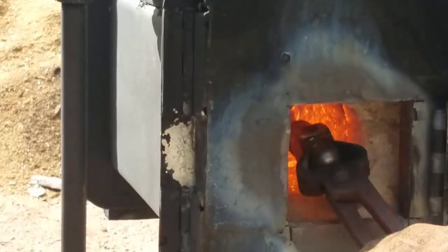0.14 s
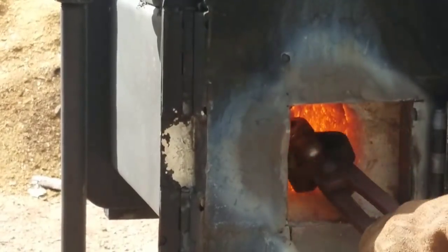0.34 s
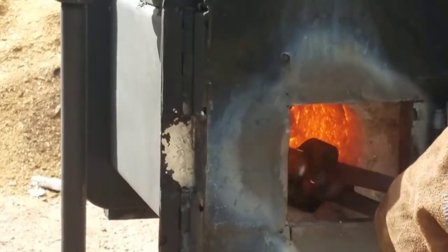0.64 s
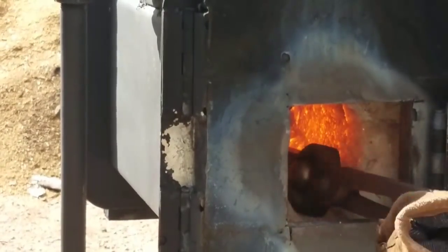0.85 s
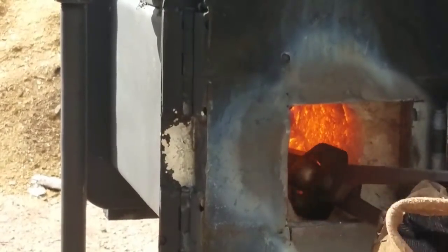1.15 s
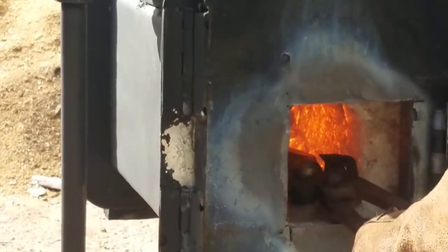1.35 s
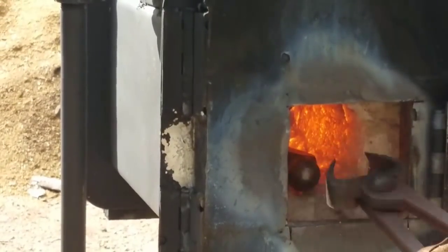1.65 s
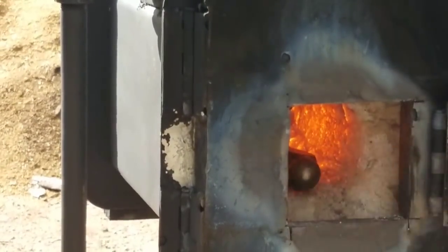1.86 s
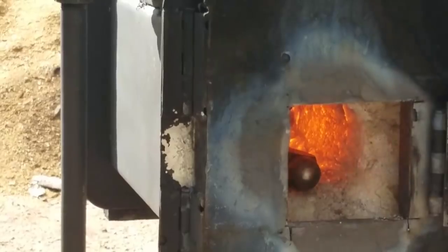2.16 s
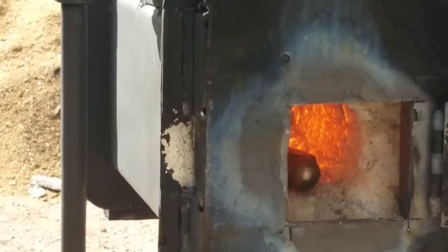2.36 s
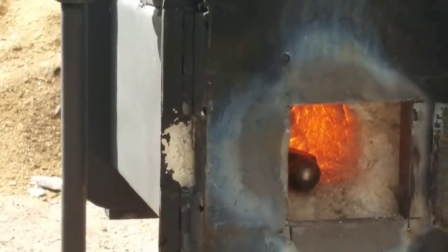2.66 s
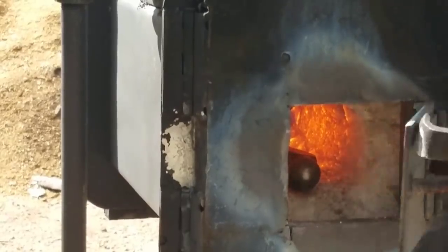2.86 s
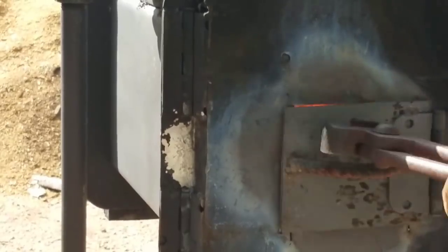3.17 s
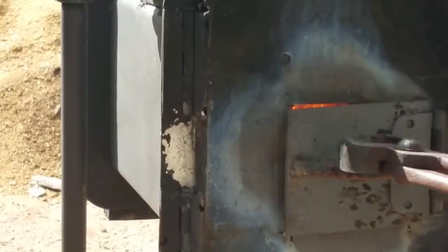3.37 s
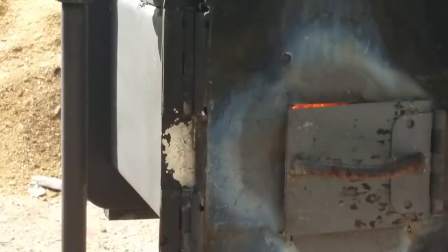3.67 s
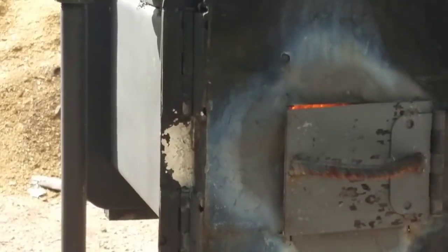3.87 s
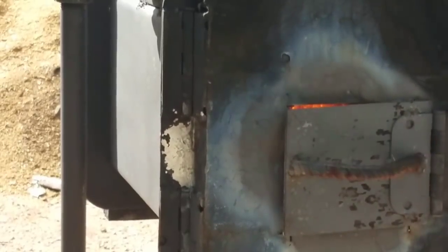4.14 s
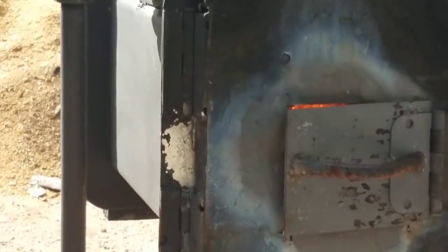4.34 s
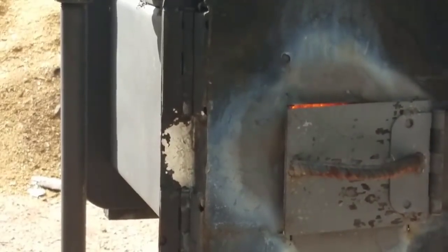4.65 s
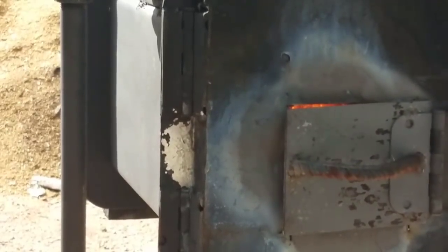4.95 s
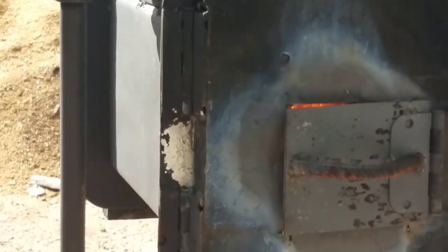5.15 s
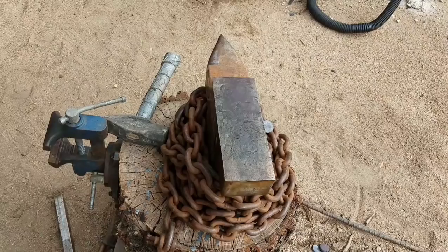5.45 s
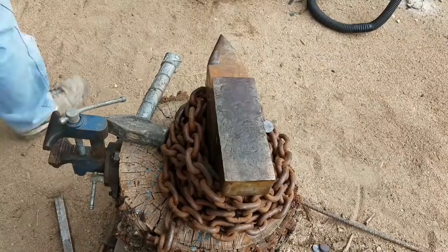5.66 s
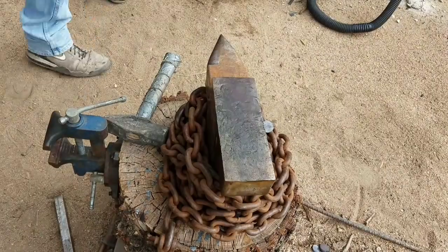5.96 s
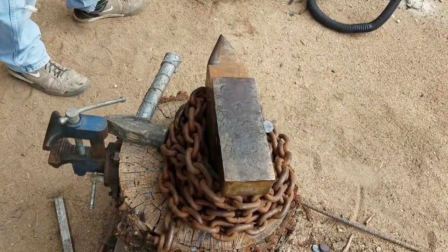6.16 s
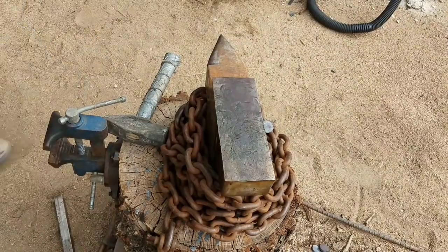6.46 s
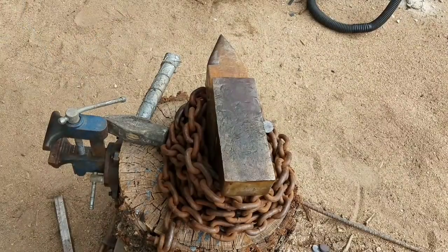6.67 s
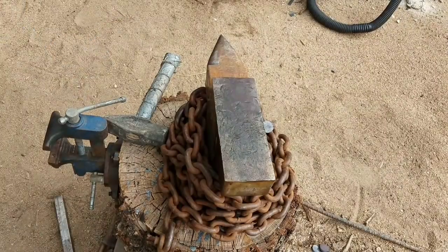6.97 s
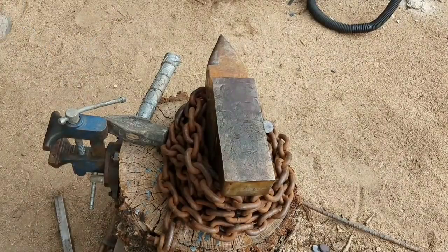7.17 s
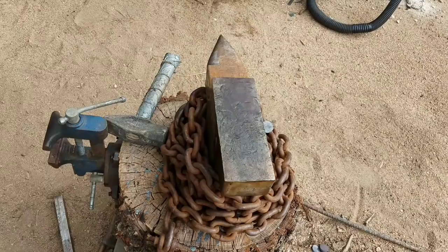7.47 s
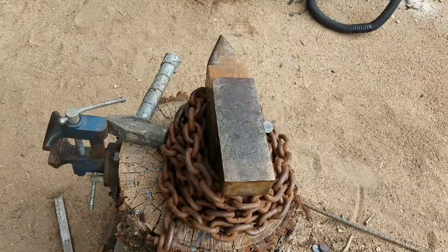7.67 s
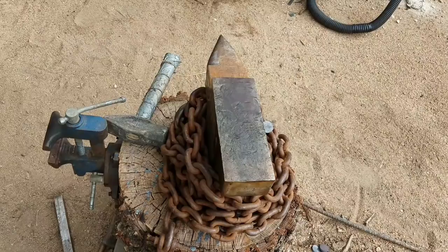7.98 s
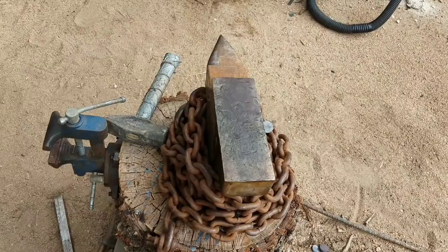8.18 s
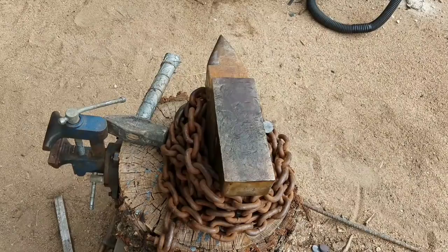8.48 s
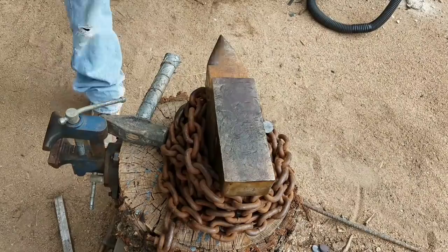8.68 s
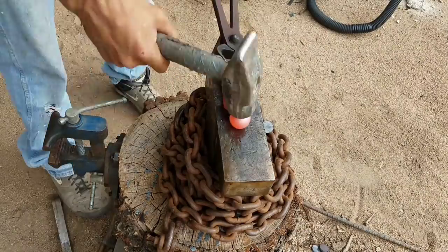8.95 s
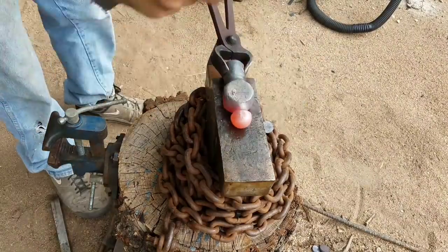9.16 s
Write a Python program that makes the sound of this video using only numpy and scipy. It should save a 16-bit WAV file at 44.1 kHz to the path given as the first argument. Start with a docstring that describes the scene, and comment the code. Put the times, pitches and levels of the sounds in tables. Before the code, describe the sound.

Rushing forge fire fades, giving way to a thinner whining blower, a few metal ticks and a single sharp hammer strike on hot iron.

```python
"""A smithy. Close by, a blower-fed forge roars: flame and air jet sound through a resonant chamber.
Its door swings shut at about 3 s, shifting the resonances; near 5 s the roar dies down.
After a short silence, at the anvil: the blower's rush, hiss and shaft whine. Tools tick, then at 9.2 s
one hammer blow lands on hot, soft iron, which chokes the ring; the gain control ducks everything."""
import sys
import numpy as np
from scipy import signal
from scipy.fft import rfft, irfft
from scipy.io import wavfile
from scipy.ndimage import uniform_filter1d

SR = 44100
rng = np.random.default_rng(int(sys.argv[2]) if len(sys.argv) > 2 else 0)


def put_to_file(sound):
    """Save the sound as 16-bit audio at rate SR, in the file named by the first command-line argument."""
    columns = np.atleast_2d(sound).T  # one column per channel
    safe = np.clip(columns, -1, 1)
    whole_steps = np.round(safe * 32767)
    wavfile.write(sys.argv[1], SR, whole_steps.astype(np.int16))


N = 411012
FRAME, HOP = 2048, 512
TIME_S = np.arange(N) / SR
FRAME_TIME_S = np.arange(N // HOP + 5) * HOP / SR
BIN_HZ = np.fft.rfftfreq(FRAME, 1 / SR)


def gain_of(db):
    """Decibels to amplitude."""
    return 10 ** (np.asarray(db) / 20)


def unit_rms(x):
    """Scale to rms 1."""
    return x / np.sqrt(np.mean(x ** 2) + 1e-20)


def since(start_s, t):
    """Seconds since the start, zero before it."""
    return np.maximum(t - start_s, 0)


def follow(curve, t):
    """Curve value at times t."""
    return np.interp(t, *np.transpose(curve))


def swing(curve, t):
    """Curve value at times t, less its mean."""
    return follow(curve, t) - follow(curve, np.linspace(curve[0][0], curve[-1][0])).mean()


def spectrum(points):
    """Value per bin, interpolated over log frequency."""
    hz, value = np.transpose(points)
    return np.interp(np.log(BIN_HZ + 1), np.log(hz + 1), value)


def resonance(hz, width_hz):
    """Bell of height 1; full width at half height."""
    return .5 ** ((2 * (BIN_HZ - hz) / width_hz) ** 2)


def wander(rate_hz):
    """Random drift, rms 1, rolled off above the rate."""
    size, step_s = N // 64 + 2, 64 / SR
    lowpass = np.exp(-(np.fft.rfftfreq(size, step_s) / rate_hz) ** 2)
    drift = irfft(rfft(rng.standard_normal(size)) * lowpass, size)
    return np.interp(TIME_S, np.arange(size) * step_s, unit_rms(drift))


def pan(x, left_db):
    """Stereo, with left_db of left over right."""
    return x * gain_of([[left_db / 2], [-left_db / 2]])


def turbulence(colour_db, coherence, phase):
    """Coloured stereo noise; random short patches of the spectrum swell and dip, a faint swirl."""
    a, b, c, d, patches = rng.standard_normal((5, len(FRAME_TIME_S), len(BIN_HZ)))
    patches = uniform_filter1d(patches, size=4, axis=0)
    patch_db = .7 * unit_rms(uniform_filter1d(patches, size=20, axis=1))
    shared = np.clip(spectrum(coherence), -1, 1)
    left = a + 1j * b
    right = (shared * left + np.sqrt(1 - shared ** 2) * (c + 1j * d)) * np.exp(-1j * spectrum(phase))
    frames = np.array([left, right]) * gain_of(colour_db + patch_db)
    noise = signal.istft(frames.transpose(0, 2, 1), nperseg=FRAME, noverlap=FRAME - HOP)[1][:, :N]
    return noise / noise.mean(0).std()


# Left-right likeness at the forge: (frequency [Hz], coherence [0-1])
FORGE_COHERENCE = [(30, 1), (400, 0.98), (800, 0.83), (1150, 0.64), (1400, 0.64), (1650, 0.17),
                   (1900, 0.75), (2500, 0.97), (3100, 0.74), (3700, 0.38), (5500, 0.39), (8000, .14),
                   (13000, .14)]
# Left lead at the forge: (frequency [Hz], phase [rad])
FORGE_PHASE_RAD = [(30, 0), (6500, -0.05), (8500, -2), (9300, 1.5), (13000, -5.5)]


def forge_noise(colour_db):
    """Turbulence with the forge's stereo spread."""
    return turbulence(colour_db, FORGE_COHERENCE, FORGE_PHASE_RAD)


# Forge door: (time [s], opening [0-1])
DOOR_OPENING = [(0, 1), (2.85, 1), (3.2, 0.22), (5.4, 0)]
# Chamber and jet resonances: (frequency [Hz], width [Hz], door open [dB], door shut [dB])
CHAMBER_MODES = [(241.4, 41, 3.5, 3.5), (368, 24, 2.5, -12.5), (451, 34, 9, 7.5), (547, 17, 6, 7.5),
                 (660, 72, 0, 8), (830, 170, 1.5, 3), (1064, 31, 4, 7.5), (1205, 14, 7.5, 9),
                 (1274, 25, 2.5, 8.5), (2150, 170, -1.5, -1), (2590, 96, 2.5, 4)]


def chamber_db():
    """Fire chamber gain per frame and bin; the door reweights its resonances."""
    opening = follow(DOOR_OPENING, FRAME_TIME_S)[:, None]
    return sum(resonance(hz, width_hz) * (opening * open_db + (1 - opening) * shut_db)
               for hz, width_hz, open_db, shut_db in CHAMBER_MODES)


CHOKE_START_S, CHOKE_DB_PER_S = 3.7, .5
EBB_START_S, ROAR_SAG_DB_PER_S = 4.875, 8.5
# Flame spectrum: (frequency [Hz], relative density [dB])
ROAR_SPECTRUM = [(20, -39), (40, -42), (60, -21), (85, -6.5), (112, -12), (170, -2), (250, -1), (330, -2),
                 (400, -8.5), (500, -9), (600, -18), (780, -26), (1100, -26.5), (2500, -51.5)]


def flame_roar(flicker, level_db=-13.5):
    """Flame in the chamber: weakens slowly behind the shut door, then dies down."""
    choke_db = CHOKE_DB_PER_S * since(CHOKE_START_S, TIME_S)
    sag_db = ROAR_SAG_DB_PER_S * since(EBB_START_S, TIME_S)
    roar = forge_noise(spectrum(ROAR_SPECTRUM) + chamber_db())
    return roar * gain_of(level_db - choke_db - sag_db + .15 * flicker)


# Air jet strength: (time [s], relative level [dB])
JET_STRENGTH = [(0, -29.1), (0.45, -28.5), (0.85, -29.2), (1.2, -28.3), (1.6, -28.5), (2.07, -30.5),
                (2.28, -28), (2.5, -28.5), (2.85, -27.5), (3.05, -28.5), (4.1, -29.0), (4.45, -28.5),
                (4.7, -29)]


def jet_db(t, flare_at_s=4.845, flare_s=.035, flare_db=2.2):
    """Jet strength about its mean, with one flare before the fire ebbs."""
    return swing(JET_STRENGTH, t) + flare_db * np.exp(-((t - flare_at_s) / flare_s) ** 2)


def jet_break(t, break_s=.025):
    """How far the jet's hollow tone has broken off, 0-1."""
    return np.minimum(since(EBB_START_S, t) / break_s, 1)


# Air jet spectrum: (frequency [Hz], relative density [dB])
RUSH_SPECTRUM = [(400, 3), (800, -0.5), (1100, -3.5), (1400, 5), (1700, 1), (2500, -1.5), (3300, -2.5),
                 (4300, -4.5), (5400, -6), (6500, -9), (8000, -10), (9300, -16.5), (13500, -38)]


def jet_rush(flow_db, flicker, level_db=-24.5):
    """Air jet through the chamber; its hollow tone follows the jet and breaks off at the ebb."""
    height_db = 2.5 + .76 * jet_db(FRAME_TIME_S) - 6 * jet_break(FRAME_TIME_S)
    hollow_db = height_db[:, None] * resonance(hz=3340, width_hz=700)
    rush = forge_noise(spectrum(RUSH_SPECTRUM) + chamber_db() + hollow_db)
    return rush * gain_of(level_db + flow_db + .65 * flicker)


# Jet fizz spectrum: (frequency [Hz], relative density [dB])
FIZZ_SPECTRUM = [(5000, -19), (8500, -13.5), (10000, -4.5), (11300, 3), (13400, -1), (15000, -30)]


def jet_fizz(flicker, level_db=-40, rise_db_per_s=8):
    """High fizz driven by the jet; steps up and keeps rising as the fire ebbs."""
    rise_db = 2.3 * jet_break(TIME_S) + rise_db_per_s * since(EBB_START_S, TIME_S)
    fizz = forge_noise(spectrum(FIZZ_SPECTRUM))
    return fizz * gain_of(level_db + 1.1 * jet_db(TIME_S) + rise_db + .7 * flicker)


# Blower whine: (order [x shaft speed], base level at forge [dB], level at anvil [dB])
WHINE_ORDERS = [(1, -31, -60), (2, -37, -56), (3, -40, -60), (4, -33.5, -26), (5, -50, -62), (6, -46, -53),
                (8, -60, -37.5), (10, -50, -64), (12, -60, -44), (16, -66, -54), (20, -66, -46)]


def blower_whine(place, shaft_hz, waver_hz, scatter, scatter_hz):
    """Shaft harmonics; moving air scatters part of each line, so it fades and blurs."""
    turns = np.cumsum(shaft_hz + waver_hz * wander(rate_hz=12.45)) / SR
    out = np.zeros(N)
    for order, forge_db, anvil_db in WHINE_ORDERS:
        angle = 2 * np.pi * (order * turns + rng.random())
        in_phase = (1 + scatter * wander(scatter_hz)) * np.sin(angle)
        quadrature = scatter * wander(scatter_hz) * np.cos(angle)
        out += gain_of(forge_db if place == "forge" else anvil_db) * unit_rms(in_phase + quadrature)
    return out


def forge(flow_sag_db_per_s=5.5):
    """The unsteady flame shakes roar, rush and fizz together; rush and whine follow the airflow."""
    flicker = wander(rate_hz=22)
    flow_db = jet_db(TIME_S) - flow_sag_db_per_s * since(EBB_START_S, TIME_S)
    roar = flame_roar(flicker)
    rush = jet_rush(flow_db, flicker)
    fizz = jet_fizz(flicker)
    whine = blower_whine("forge", shaft_hz=331.7, waver_hz=.5, scatter=.38, scatter_hz=35)
    whine *= gain_of(flow_db + .35)
    return pan(roar + whine, left_db=-1.6) + pan(rush, left_db=-.6) + pan(fizz, left_db=-1)


# Blower rush spectrum: (frequency [Hz], relative density [dB])
BLOWER_SPECTRUM = [(20, -42), (65, -40), (110, -28), (190, -18), (290, -6), (470, -5.5), (700, -10),
                   (810, -11), (920, -3), (1150, 1), (1520, 2), (1830, -3), (1950, -14.5), (3200, -40)]
# Blower hiss spectrum: (frequency [Hz], relative density [dB])
HISS_SPECTRUM = [(800, -8), (2000, 7), (2650, 5), (3250, 0.5), (3800, 1), (4450, 4), (4900, 2), (5450, 5),
                 (6000, -0.5), (7300, 1), (9000, -1), (11500, 0.5), (13500, -4)]
# Peaks and dips of housing and ground echo: (frequency [Hz], width [Hz], gain [dB])
HOUSING_BANDS = [(136, 28, 8), (342, 53, -3), (487, 83, 5.5), (588, 64, -8.5), (648, 77, 7), (724, 30, -6),
                 (847, 40, -10), (1025, 66, -5.5), (1342, 52, -23), (1630, 88, -2), (2070, 65, -13)]
# Slow swell of the rush: (time [s], relative level before swell_depth [dB])
RUSH_SWELL = [(5.6, -17.5), (5.9, -16), (6.45, -16.5), (7.3, -16.5), (7.8, -16.5), (8.25, -16.5),
              (8.6, -17), (8.75, -16.5), (9.05, -17)]
# Left-right likeness at the anvil: (frequency [Hz], coherence [0-1])
ANVIL_COHERENCE = [(80, 0.6), (350, 0.99), (1600, 0.96), (2400, 0.9), (2900, 1), (4000, 0.56), (5000, 0.7),
                   (6200, .2), (9000, .17), (13000, 0.65)]
# Left lead at the anvil: (frequency [Hz], phase [rad])
ANVIL_PHASE_RAD = [(30, 0.5), (3000, -0.4), (4500, -0.8), (6500, -2), (9000, -2.5), (12000, -2)]


def blower(rush_db=-18, hiss_db=-27.5, swell_depth=1.3):
    """From the anvil: air rushing through the fan housing, its hiss and the blades' whine."""
    housing_db = sum(db * resonance(hz, width_hz) for hz, width_hz, db in HOUSING_BANDS)
    rush = turbulence(spectrum(BLOWER_SPECTRUM) + housing_db, ANVIL_COHERENCE, ANVIL_PHASE_RAD)
    rush *= gain_of(rush_db + swell_depth * swing(RUSH_SWELL, TIME_S))
    hiss = turbulence(spectrum(HISS_SPECTRUM), ANVIL_COHERENCE, ANVIL_PHASE_RAD)
    hiss *= gain_of(hiss_db + .4 * wander(rate_hz=6.7))
    whine = blower_whine("anvil", shaft_hz=329.2, waver_hz=.35, scatter=.45, scatter_hz=24)
    return pan(rush + whine, left_db=-1.4) + pan(hiss, left_db=-.9)


# Tool ticks, then the hammer: (time [s], gain [dB], ring t60 scale [x], low-pass [Hz])
CONTACTS = [(8.8323, -15, 1.5, 9000), (9.0662, -2.5, .75, 11000), (9.0780, -16, 1.2, 4500),
            (9.1953, 12.5, 1.0, 16000)]
# Steel modes, damped by the hot iron: (frequency [Hz], relative level [dB], base t60 [s])
STEEL_MODES = [(845, -6, .013), (1577, -6, .013), (2245, -8, .011), (3068, 0, .011), (3500, -6, .008),
               (3850, -2, .009), (4258, -2, .01), (5300, -7, .007), (6400, -8, .009), (7500, -9, .008),
               (9265, -8, .004), (10610, -11, .0044)]


def anvil(crack_db=-13, crack_t60_s=.011, yard_db=-42, yard_t60_s=.12):
    """Each contact: a crack, a choked ring and faint scatter from the yard; duller when light."""
    out, t = np.zeros((2, N)), np.arange(SR // 4) / SR
    noise_envelope = gain_of(crack_db - 60 * t / crack_t60_s) + gain_of(yard_db - 60 * t / yard_t60_s)
    for start_s, gain_db, t60_scale, lowpass_hz in CONTACTS:
        ring = np.zeros((2, len(t)))
        for hz, mode_db, t60_s in STEEL_MODES:
            cycles = hz * t + rng.random() + rng.random((2, 1)) / 6  # small left-right offset
            ring += gain_of(mode_db - 60 * t / (t60_s * t60_scale)) * np.sin(2 * np.pi * cycles)
        contact = ring / abs(ring).max() + noise_envelope * rng.standard_normal((2, len(t)))
        contact = signal.lfilter(*signal.butter(2, lowpass_hz, fs=SR), contact)
        span = out[:, round(start_s * SR):][:, :len(t)]
        span += gain_of(gain_db) * contact[:, :span.shape[1]]
    return out


def scene(forge_end_s=5.386, anvil_start_s=5.45):
    """The forge, a moment of silence, then the anvil."""
    fade_db = np.clip((TIME_S - forge_end_s) * 2500, 0, 55)
    at_forge = gain_of(-fade_db) * (TIME_S < anvil_start_s)
    at_anvil = TIME_S >= anvil_start_s
    return forge() * at_forge + blower() * at_anvil + anvil()


def record(dry, instant_share=.45, settle_s=.022, release_db_per_s=8, low_cut_hz=35, edge_hz=13250):
    """Low cut; gain control grabs an overload, settles deeper, lets go slowly; clipping; band limit."""
    heard = signal.sosfilt(signal.butter(2, low_cut_hz, "high", fs=SR, output="sos"), dry)
    overload_db = np.maximum(20 * np.log10(abs(heard).max(0) / .9 + 1e-9), 0)
    release_db = release_db_per_s * TIME_S
    held_db = np.maximum.accumulate(overload_db + release_db) - release_db
    pole = np.exp(-1 / (settle_s * SR))
    settled_db = signal.lfilter([1 - pole], [1, -pole], held_db)
    duck_db = instant_share * held_db + (1 - instant_share) * settled_db
    clipped = np.clip(heard / gain_of(duck_db), -.92, .92)
    band_limit = signal.firwin(511, edge_hz, window=("kaiser", 9), fs=SR)
    return signal.oaconvolve(clipped, band_limit[None], "same")


dry = scene()
out = record(dry)
put_to_file(out)
```